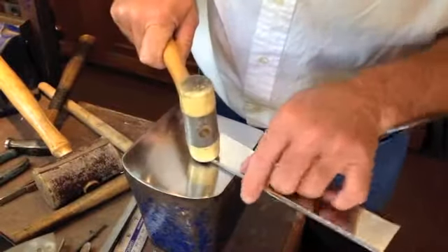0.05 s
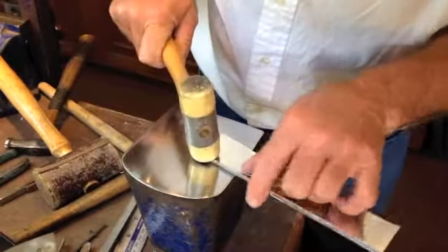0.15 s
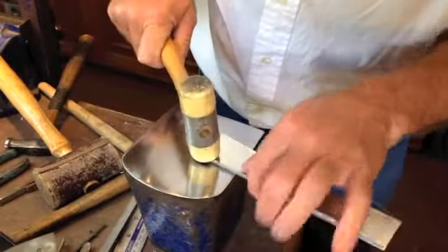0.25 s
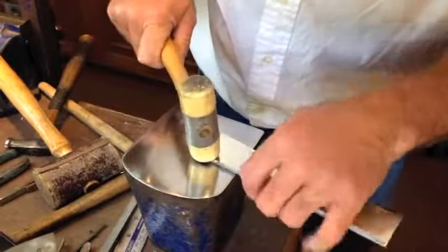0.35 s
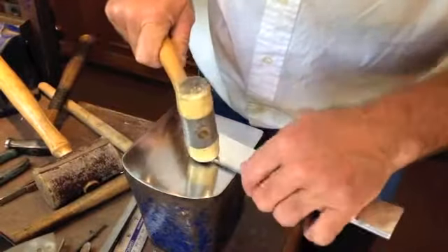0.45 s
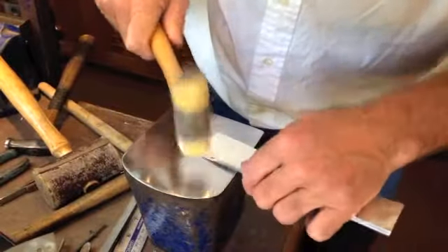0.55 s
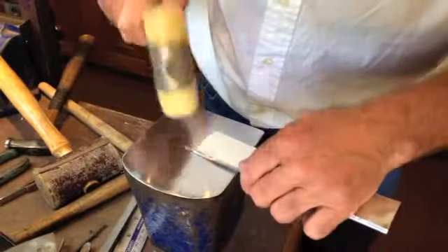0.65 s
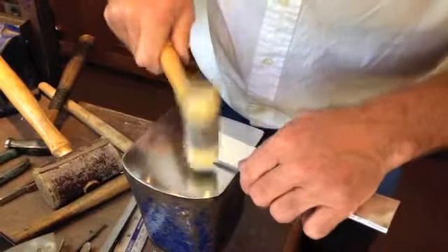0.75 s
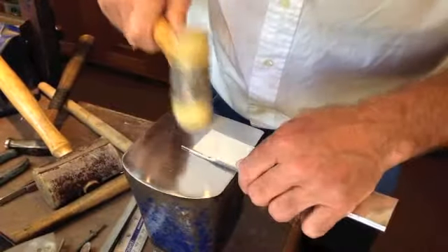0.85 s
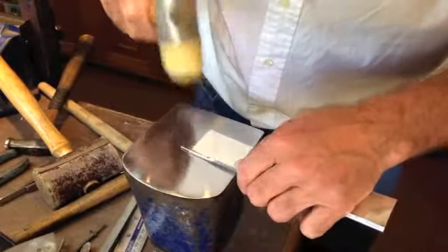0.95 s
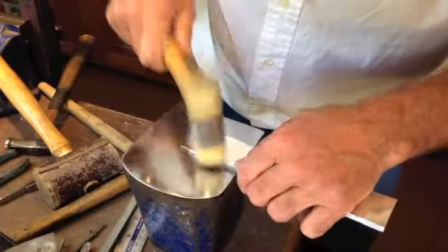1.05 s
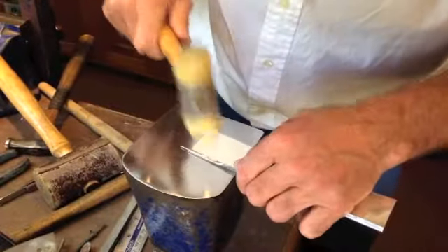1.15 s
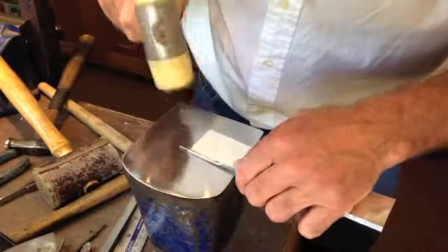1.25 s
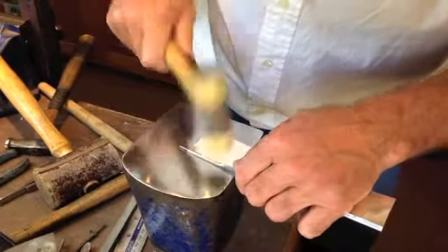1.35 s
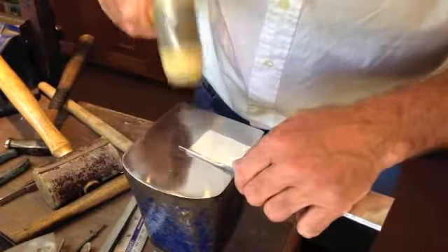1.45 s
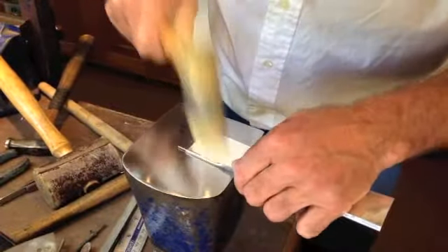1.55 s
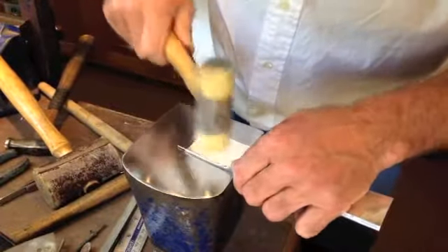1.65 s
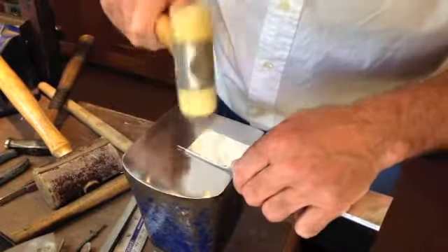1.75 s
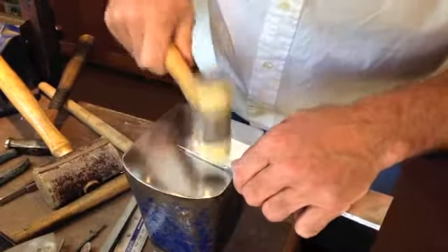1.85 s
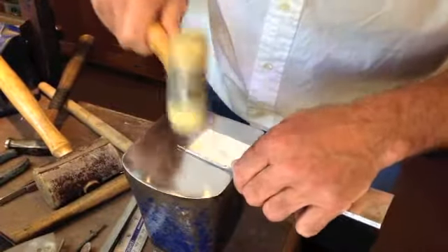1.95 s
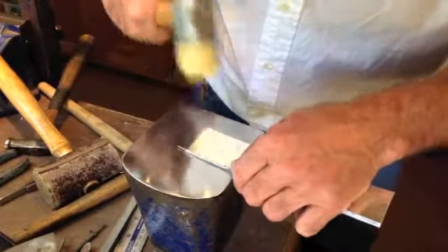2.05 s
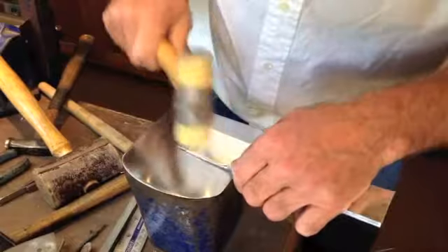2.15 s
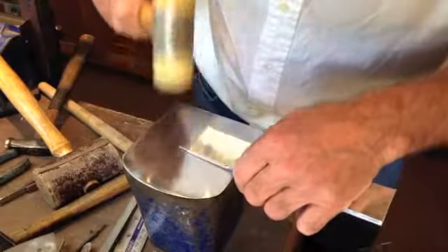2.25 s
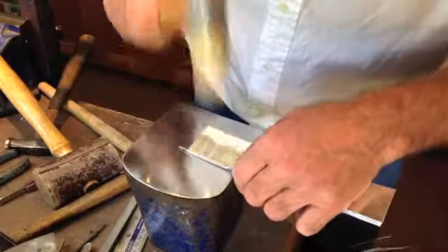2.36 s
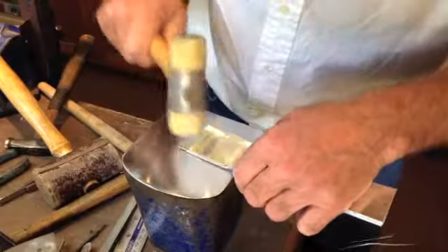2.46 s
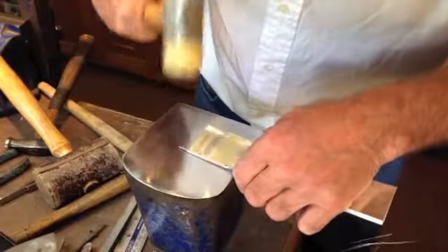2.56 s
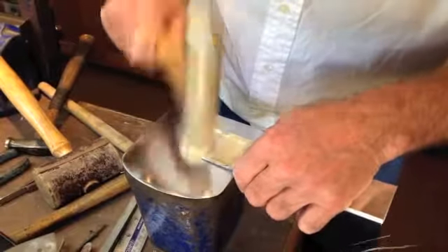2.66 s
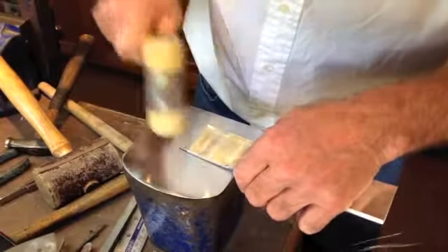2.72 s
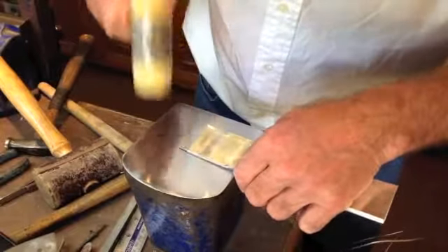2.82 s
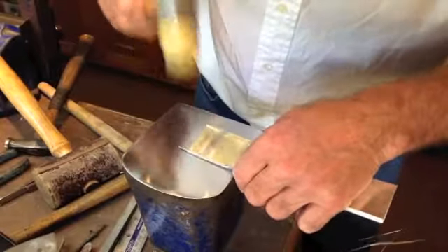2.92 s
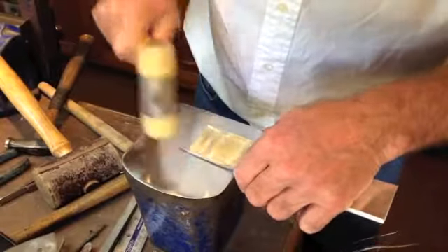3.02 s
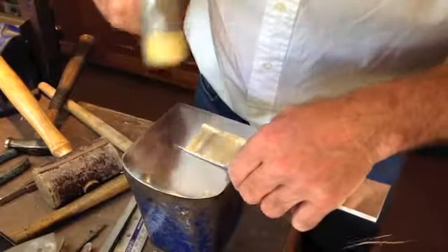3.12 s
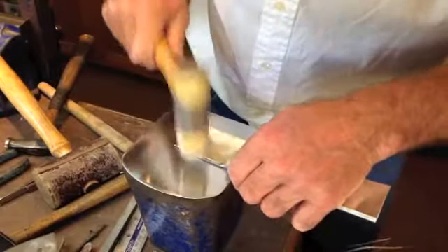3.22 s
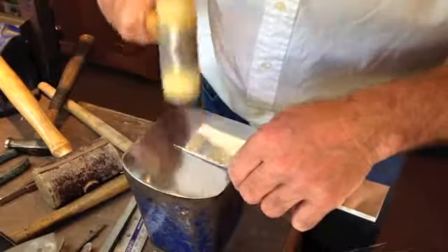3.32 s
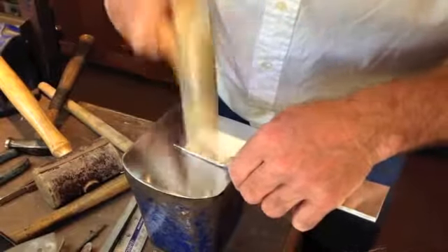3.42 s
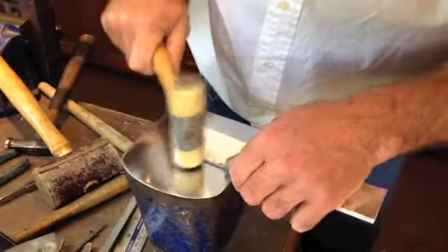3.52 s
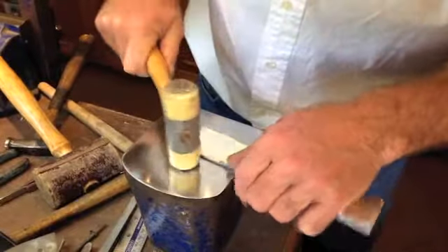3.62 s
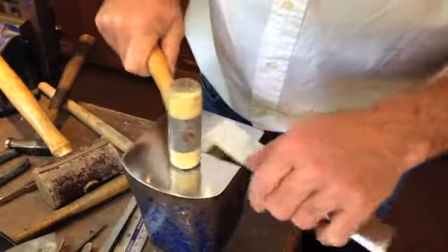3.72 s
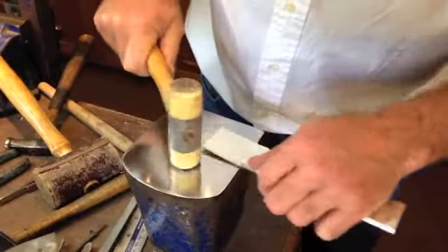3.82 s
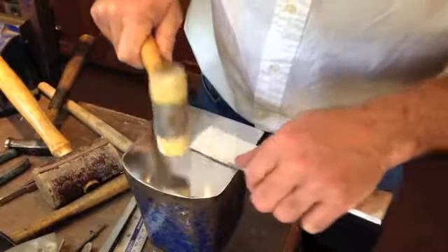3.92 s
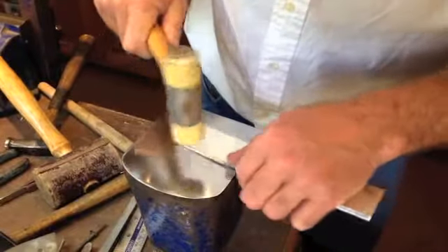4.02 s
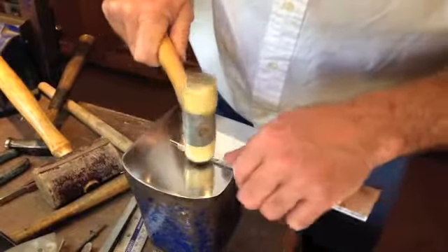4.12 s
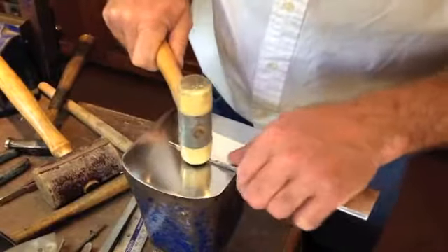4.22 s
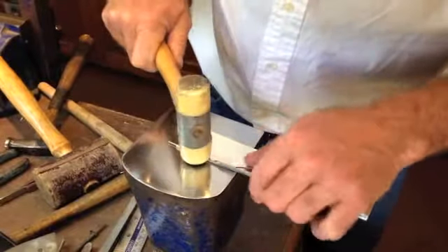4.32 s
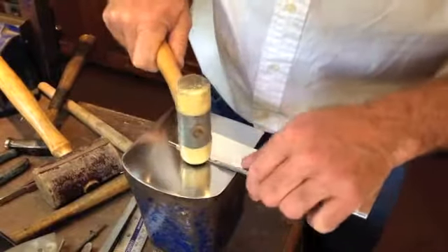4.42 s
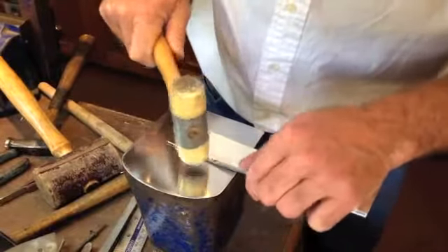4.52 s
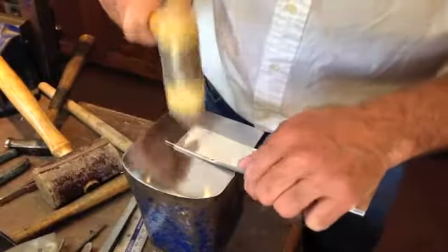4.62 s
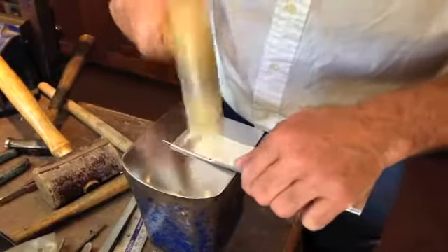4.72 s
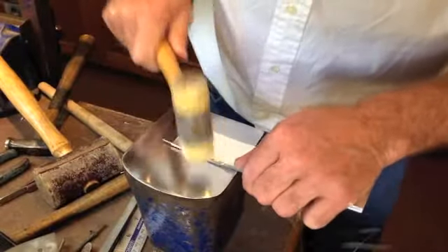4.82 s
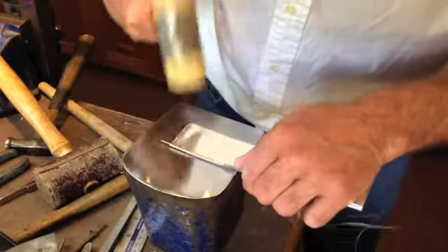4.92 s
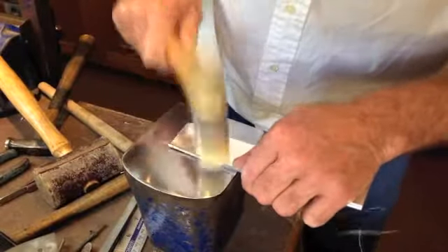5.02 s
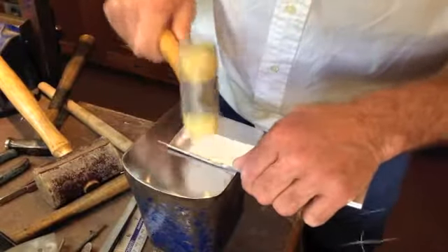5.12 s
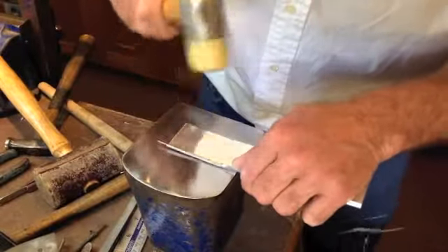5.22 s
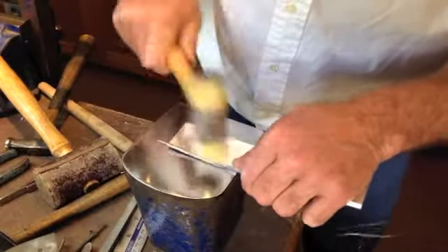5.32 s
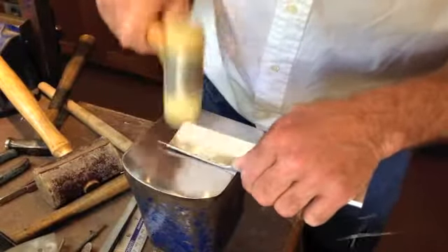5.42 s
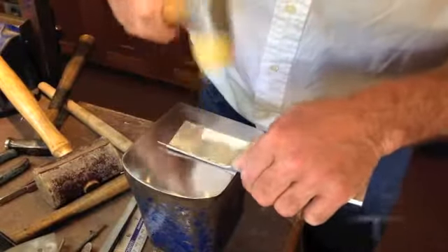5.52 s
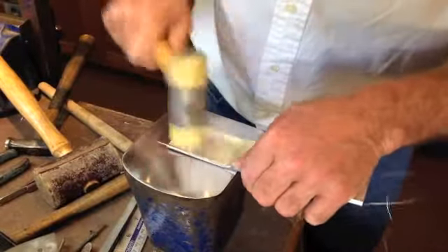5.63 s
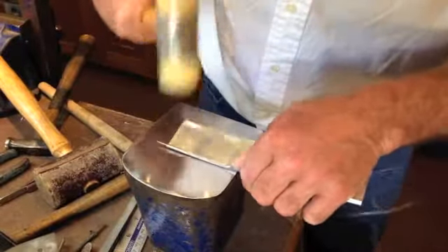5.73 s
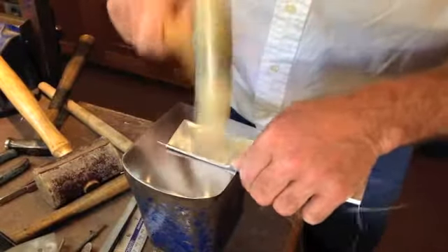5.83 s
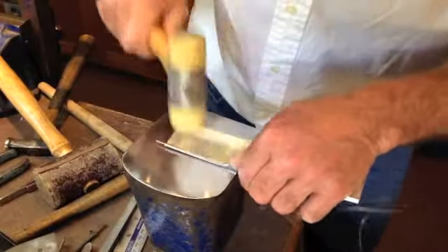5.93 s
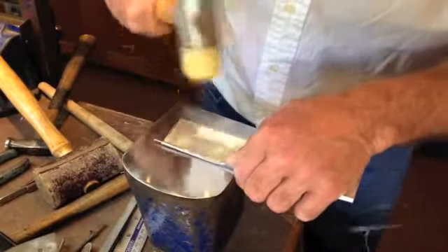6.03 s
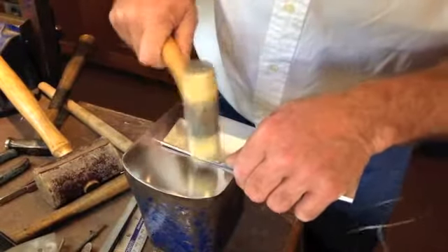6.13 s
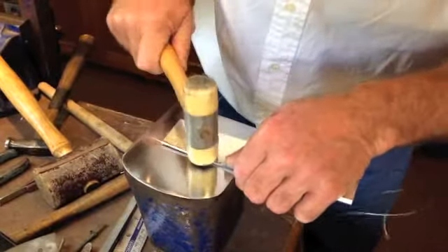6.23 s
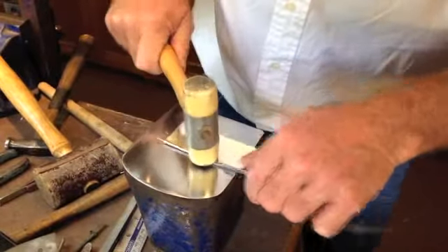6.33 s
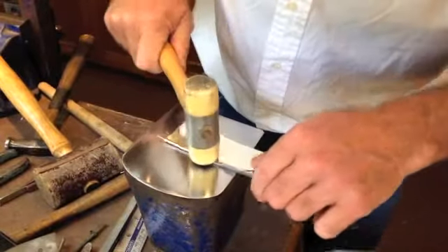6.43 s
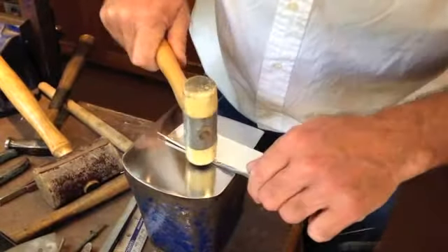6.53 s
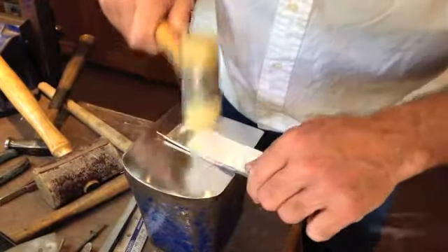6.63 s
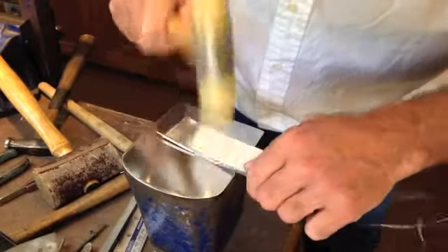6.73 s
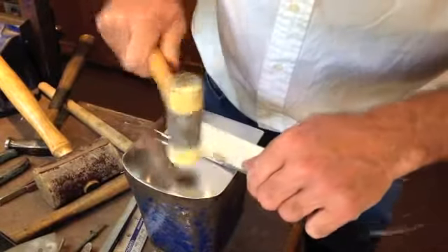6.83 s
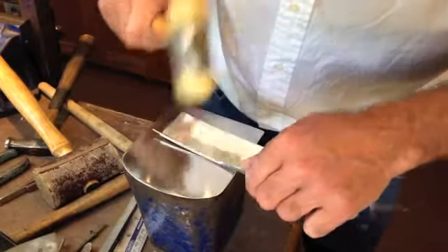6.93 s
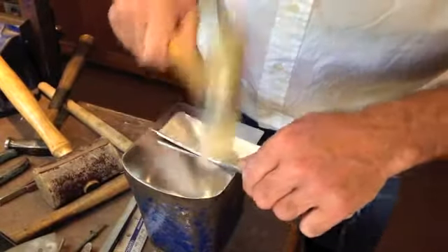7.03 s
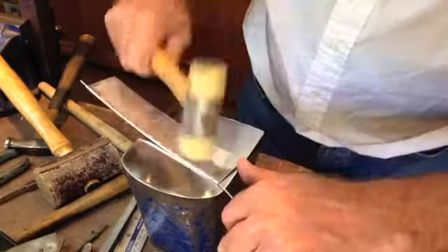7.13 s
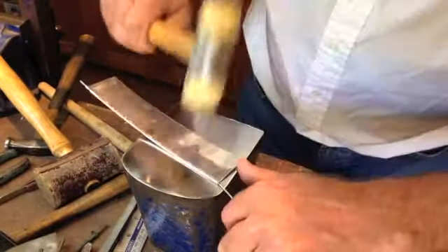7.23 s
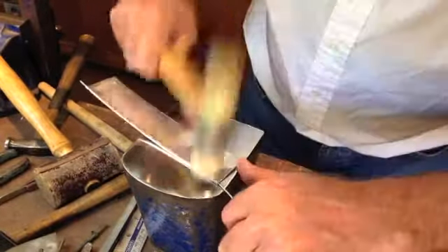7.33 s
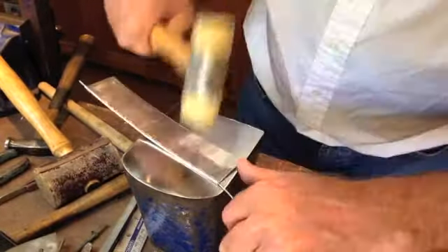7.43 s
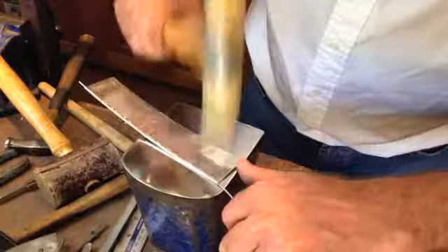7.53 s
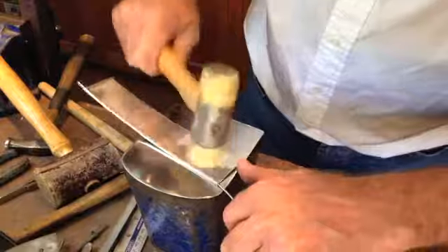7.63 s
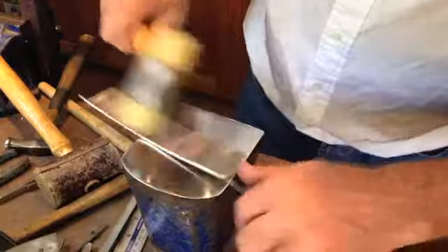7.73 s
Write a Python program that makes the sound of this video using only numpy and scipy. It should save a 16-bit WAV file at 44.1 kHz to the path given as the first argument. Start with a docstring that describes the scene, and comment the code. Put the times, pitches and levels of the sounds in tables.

```python
"""Small taps and faint rustle over a low room hum, then a mallet strikes a silver strip on a steel stake in quick runs,
heard close up in a small workshop. Each blow is a noise crack with decaying sines for sheet, mallet, bench and floor,
plus chattering noise as the loose strip buzzes. Taps of shaped noise with a short sheet ring, and noise rustle,
return between runs. Cracks and taps feed a diffuse echo. A short dip in level comes just before the last three blows."""
import sys
import numpy as np
from scipy import signal
from scipy.fft import rfft, irfft, next_fast_len
from scipy.io import wavfile
from scipy.ndimage import uniform_filter1d

SR = 44100
rng = np.random.default_rng(int(sys.argv[2]) if len(sys.argv) > 2 else 0)


def voltage_ratio(decibels):
    """Convert decibels (scalar or array-like) to amplitude ratios, 20 dB per decade."""
    exponent = np.asarray(decibels, float) / 20
    return 10 ** exponent


def wav_record(signal):
    """Record a signal, one row per channel, as 16-bit PCM in the file named by sys.argv[1]."""
    frames = np.transpose(np.atleast_2d(signal))
    bounded = np.clip(frames, -1, 1)
    # unit amplitude maps onto the largest positive 16-bit level
    quanta = np.round(bounded * 32767).astype(np.int16)
    wavfile.write(sys.argv[1], SR, quanta)


N = 342657
T = np.arange(N) / SR  # s


def colour(x, points):
    """Shapes a signal by (Hz, dB) points joined on a log axis, without phase shift."""
    hz, db = np.transpose(points)
    size = next_fast_len(len(x))
    f = np.maximum(np.arange(size // 2 + 1) * SR / size, 1)
    gain = voltage_ratio(np.interp(np.log(f), np.log(hz), db))
    return irfft(rfft(x, size) * gain, size)[:len(x)]


def noise(t, points):
    """Coloured noise as long as t."""
    return colour(rng.standard_normal(len(t)), points)


def unit(x):
    """Scales to an rms of one."""
    return x / np.sqrt(np.mean(x ** 2))


def ring(modes, t, scatter_db, detune):
    """Decaying sines, weighted and tuned a little differently at every call."""
    hz, db, t60_s = np.transpose(modes)[:, :, None]
    chance = rng.standard_normal((2, len(modes), 1))
    phase = 2 * np.pi * hz * (1 + detune * chance[0]) * t
    level = voltage_ratio(db + scatter_db * chance[1])
    decay = np.exp(-np.log(1000) * t / t60_s)
    return np.sum(level * decay * np.sin(phase), axis=0)


def add(out, start_s, x):
    """Mixes a sound in at its start time."""
    i = int(start_s * SR)
    out[i:i + len(x)] += x[:N - i]


def walk(rate_hz):
    """Random levels, each held for 1 / rate_hz, then smoothed."""
    k = int(SR / rate_hz)
    held = np.repeat(rng.standard_normal(N // k + 1), k)
    return uniform_filter1d(held, k)[:N]


def patchy(x):
    """Random uneven colour, drawn anew for each sound, to roughen the noise."""
    hz = np.geomspace(300, 16000, num=90)
    scatter_db = 4
    return colour(x, np.c_[hz, scatter_db * rng.standard_normal(len(hz))])


# Crack spectrum, shared by scratches and rustle. Each row: frequency in Hz, relative level in dB.
CRACK_SPECTRUM = [(530, -27.5), (900, -3.5), (1840, -5), (2270, -11), (2820, 1), (3550, -4.5), (4310, -0.5),
                  (5300, -5.5), (10100, -7), (12700, -13), (14200, -8.5), (15600, -20), (16400, -48)]


def crack(tilt, t):
    """The sheet flattens against the steel over a couple of milliseconds: a noise burst with a short tail."""
    rise_s = 0.0016
    slap = (t / rise_s) ** 2 * np.exp(2 - 2 * t / rise_s)
    tail = 0.36 * np.minimum(t / 0.004, 1) * np.exp(-t / 0.009)
    return (slap + tail) * colour(unit(noise(t, CRACK_SPECTRUM)), tilt)


# Pressed sheet, a close damped cluster. Each row: share of its ring pitch, relative level in dB, t60 in s.
SHEET_MODES = [(.9, -11, 0.025), (0.949, -6, 0.02), (1, -3.5, 0.024), (1.05, -5, 0.02), (1.099, -9, .022)]


def sheet(hz, t):
    """The damped cluster of sheet modes around one pitch."""
    modes = [(share * hz, db, t60_s) for share, db, t60_s in SHEET_MODES]
    return ring(modes, t, scatter_db=2.0, detune=0.012)


# Mallet head and stake seat. Each row: frequency in Hz, relative level in dB, t60 in s.
KNOCK_MODES = [(379.3, -2, 0.097), (412.6, -11, 0.16), (527, 2.5, 0.087), (788, 0, 0.02), (926, 3, 0.021),
               (1098, 0, 0.066), (1433, -9.5, .02)]


def knock(t):
    """Short modes of the mallet head and the stake in its seat."""
    return ring(KNOCK_MODES, t, scatter_db=4.5, detune=0.03)


# Bench top. Each row: frequency in Hz, relative level in dB, t60 in s.
BENCH_MODES = [(137.3, -6, 0.11), (170.7, -5.5, 0.21), (191, 3, 0.11), (224.8, 0, 0.17),
               (265.8, -7.5, 0.25)]


def thump(t):
    """Low modes of the bench top."""
    return ring(BENCH_MODES, t, scatter_db=2.5, detune=0.026)


# Floor and walls, set going through the stand. Each row: frequency in Hz, relative level in dB, t60 in s.
BOOM_MODES = [(48.2, -11.5, 1), (61, -8.5, 0.31), (76, -6, 0.85), (94.86, -1.5, 0.44), (112.7, -9.5, 0.52),
              (141.3, -1, 0.33), (186.5, -7, 0.46), (226.8, -12, 0.35)]


def boom(t):
    """The lows build slowly, hold, then fall off steeply, with a random, uneven wobble in level."""
    swell = (1 - np.exp(-t / 0.034)) * np.exp(-(t / 0.18) ** 4)
    wobble = voltage_ratio(3.7 * walk(50.6)[:len(t)])
    return swell * wobble * ring(BOOM_MODES, t, scatter_db=2.0, detune=0.0691)


# Loose strip's buzz spectrum. Each row: frequency in Hz, relative level in dB.
BUZZ_SPECTRUM = [(150, -24.5), (250, -2.5), (355, -7.5), (521, -5.5), (632, -12), (2480, -20.5),
                 (2700, -21), (5640, -20.5), (14300, -37), (15600, -33), (16400, -88)]


def buzz(tilt, ring_hz, ring_db, t):
    """The free end chatters on the stake until its swing dies; the treble goes first."""
    chatter = np.minimum(t / 0.001, 1) * np.exp(-t / 0.057 - (t / 0.27) ** 2)
    sizzle = np.minimum(t / 0.003, 1) * np.exp(-t / 0.07 - (t / 0.095) ** 2)
    rattle = colour(unit(patchy(noise(t, BUZZ_SPECTRUM))), tilt)
    rattle = rattle * voltage_ratio(2.4 * walk(130)[:len(t)] + 1.9 * walk(40)[:len(t)])
    # the chatter keeps the sheet's ring going roughly
    lift_db = 0.8 * max(ring_db + 13, 0)
    rattle = colour(rattle, [(0.8 * ring_hz, 0), (0.93 * ring_hz, lift_db),
                             (1.09 * ring_hz, lift_db), (1.25 * ring_hz, 0)])
    dull = colour(rattle, [(2500, -2.5), (7000, -19)])
    return chatter * dull + sizzle * (rattle - dull)


# Mallet blows and bounces, levels before each layer's trim. Each row: start in seconds, crack level in dB,
# bench thump level in dB, strongest sheet ring in Hz, sheet ring relative to the crack in dB.
BLOWS = [(0.821, -11, -25.5, 4480, -15), (1.0961, -5, -27.5, 1860, -16), (1.3766, -3, -23, 4110, -20),
         (1.6523, -11, -26.5, 1830, -9), (1.9172, -7.5, -22, 4620, -12), (2.1917, -9, -17.5, 3120, -11.5),
         (2.4713, -4.5, -20.5, 3720, -9.5), (2.7409, -4, -18.5, 2640, -13.5),
         (3.017, -8.5, -20, 2640, -10.5), (3.2936, -7, -21, 1590, -12.5), (3.5176, -5.5, -22.5, 2870, -9.5),
         (3.5647, -12, -27, 2810, -4), (3.596, -11, -28.5, 1860, -9), (4.1982, -15.5, -31, 4060, -3),
         (4.23, -12, -37, 4120, 0), (4.827, -3, -25, 1840, -18), (5.1077, -3.5, -21.5, 2110, -22),
         (5.3816, -5, -22, 2920, -11.5), (5.656, -5, -18, 2860, -11.5), (5.9262, -6.5, -21, 3060, -7),
         (6.1681, -5, -20, 2860, -20.5), (6.2215, -11, -27, 2750, -1), (6.2559, -14, -37, 2720, -11.5),
         (6.8378, -10.5, -27.5, 2930, -11), (7.169, -14, -19, 4150, -11), (7.4042, -6.5, -18, 4260, -8.5),
         (7.6329, -7.5, -14.5, 4450, -15)]
# Colour of the blows as the work moves along the strip. Each row: time in seconds, treble lift in dB,
# knock trim from the thump in dB, boom trim from the thump in dB.
BLOW_COLOUR = [(0.8, 0.5, -6, 3), (1.4, -6, -0.5, -3), (2.2, -2.5, -1.5, -2.5), (2.5, -.6, -3.5, -1),
               (3.4, 1.8, -1.2, -2), (4.2, 2.5, -4, 4), (5.1, -8.5, -2.2, -2), (5.7, -5, -2.5, -2),
               (6.8, -1.8, -2.5, 3), (7.3, 5.5, -14, -1), (7.65, 7, -4.5, -4)]


def blows():
    """Sums the layers of every blow; only the crack will be echoed."""
    sharp, body = np.zeros(N), np.zeros(N)
    t = T[:SR * 3 // 4]
    when_s, treble_db, knock_trim_db, boom_trim_db = np.transpose(BLOW_COLOUR)
    for s, crack_db, thump_db, ring_hz, ring_db in BLOWS:
        knock_db = thump_db + np.interp(s, when_s, knock_trim_db)
        boom_db = thump_db + np.interp(s, when_s, boom_trim_db)
        # flatter contact, more treble
        tilt = [(2500, 0.013), (12000, np.interp(s, when_s, treble_db))]
        add(sharp, s + 0.0005, voltage_ratio(crack_db - 8.0) * crack(tilt, t))
        add(body, s + 0.001054, voltage_ratio(crack_db + ring_db) * sheet(ring_hz, t))
        add(body, s + 0.002392, voltage_ratio(knock_db - 2.0) * knock(t))
        add(body, s + 0.002, voltage_ratio(thump_db - 2.0) * thump(t))
        add(body, s + 0.0014, voltage_ratio(boom_db) * boom(t))
        add(body, s, voltage_ratio(thump_db - 7) * buzz(tilt, ring_hz, ring_db, t))
    return sharp, body


# Steel stake, low and high ring. Each row: frequency in Hz, t60 in s.
STAKE_MODES = [(3490, .55), (9275, .7)]
# Blows that leave the stake free to sing. Each row: start in seconds, low ring in dB, high ring in dB.
STAKE_SINGS = [(.822, -44, -75), (1.097, -70, -60), (2.192, -62, -63), (2.472, -56, -59), (2.742, -63, -63),
               (3.017, -60, -64), (3.596, -60, -56), (5.927, -47, -58), (7.169, -58, -54),
               (7.405, -49, -53), (7.633, -54, -57)]


def stake():
    """Two thin rings of the steel, faded out by about when the next blow comes."""
    out, t = np.zeros(N), T[:SR // 2]
    fade = np.exp(-(t / 0.28) ** 4)
    for s, *levels_db in STAKE_SINGS:
        modes = [(hz, db, t60_s) for (hz, t60_s), db in zip(STAKE_MODES, levels_db)]
        add(out, s, fade * ring(modes, t, scatter_db=0, detune=0))
    return out


# The strip touches the stake or the bench, levels before trim. Each row: start in seconds, tick level in dB,
# thud level in dB, ring in Hz, ring relative to the tick in dB.
TAPS = [(0.0228, -42.5, -70, 2026, -7), (0.0856, -42.5, -69, 4200, -17), (0.176, -52.5, -90, 3280, -9),
        (0.252, -36.5, -60, 4000, -11), (0.2804, -44, -66, 6970, -6), (0.361, -49.5, -83, 10200, -9),
        (0.401, -56, -70, 9950, -6), (0.481, -52.5, -74, 2040, -17), (0.503, -66, -53.5, 6880, -9),
        (0.595, -58.5, -79, 5030, -3), (1.034, -55, -52, 2040, -6), (2.0404, -44.5, -53, 2035, 1.5),
        (2.2852, -32.5, -40, 5500, -8), (2.569, -31, -56, 5800, -8), (2.8422, -32, -44, 1530, -15),
        (3.235, -40, -52.5, 1980, -12), (3.6598, -33.5, -46, 1800, -3.5), (3.692, -45, -48, 1820, -13),
        (3.7643, -33.5, -53, 1540, -18), (3.8018, -40.5, -37, 2010, 4), (3.8133, -43.5, -37, 1900, 2),
        (3.8884, -45, -50, 4480, -10), (3.941, -65, -36, 1510, -3), (4.093, -57, -69, 1950, -10),
        (4.4887, -45, -77, 3500, -8), (4.5175, -47.5, -73, 2250, -8), (4.558, -49, -67, 2000, -5),
        (6.326, -31.5, -49, 6300, -13), (6.446, -42, -74, 4140, -19), (6.553, -44, -71, 4430, -5),
        (6.602, -44.5, -71, 4460, -12), (6.637, -44.5, -67, 4530, -8), (6.672, -46, -57, 1940, -11),
        (7.117, -41, -45.5, 2980, -11.5)]


def taps():
    """Light contacts: a brief scratch and a sheet ring, both echoed, and a dull, rough knock."""
    sharp, body, t = np.zeros(N), np.zeros(N), T[:SR // 5]
    scratch_fade = np.minimum(t / 0.0018, 1) * np.exp(-t / 0.018)
    thud_fade = np.minimum(t / 0.0029, 1) * np.exp(-t / 0.036)
    for s, tick_db, thud_db, ring_hz, ring_db in TAPS:
        peak_db = max(ring_db + 15.5, 0)
        scratch = patchy(noise(t, CRACK_SPECTRUM))
        scratch = unit(colour(scratch, [(0.78 * ring_hz, 0), (ring_hz, peak_db), (1.1 * ring_hz, 0)]))
        flutter = voltage_ratio(2.8 * walk(400)[:len(t)])
        thud = unit(noise(t, [(150, -16.0), (330, 11), (600, 3.5), (1300, -11.5), (2500, -41)]))
        add(sharp, s, voltage_ratio(tick_db - 8.5) * scratch_fade * flutter * scratch)
        add(sharp, s, voltage_ratio(tick_db + ring_db) * sheet(ring_hz, t))
        add(body, s, voltage_ratio(thud_db - 2.0) * thud_fade * thud)
    return sharp, body


# Rustle of hands moving the strip, one list per spell. Each row: time in seconds, level in dB.
HAND_SPELLS = [
    [(0.0, -57.5), (0.154, -102), (0.478, -79), (0.62, -98), (0.8, -93)],
    [(3.7, -77), (3.76, -60), (3.99, -75), (4.17, -84)],
    [(4.4, -64.5), (4.584, -68), (4.8, -94)],
    [(6.42, -80), (6.478, -73), (6.618, -71), (6.82, -80)],
]


def hands():
    """Uneven noise rustle while the strip is moved."""
    gain = sum(voltage_ratio(np.interp(T, *np.transpose(spell), left=-120, right=-120)) for spell in HAND_SPELLS)
    return gain * voltage_ratio(1.1 * walk(57)) * unit(noise(T, CRACK_SPECTRUM))


# Room echo. Each row: band centre in Hz, level in dB, t60 in s before the extra late fall.
ROOM_BANDS = [(190, 4, 0.33), (361, -12, 0.8), (743, -22.5, 0.48), (1310, -15.5, 0.29), (2740, -29.5, 0.13),
              (5460, -19, 0.38), (11700, -20.5, 0.16)]


def room(x):
    """Diffuse echo that builds in a few milliseconds, then falls ever faster, each band at its own rate."""
    t, echo = T[:SR // 2], 0
    build = np.clip(t / 0.0045 - 0.4, 0, 1)
    for hz, db, t60_s in ROOM_BANDS:
        band = noise(t, [(hz / 4, -40), (hz / 2 ** 0.5, -3), (hz * 2 ** 0.5, -3), (hz * 4, -40)])
        fade = np.exp(-np.log(1000) * t / t60_s - (t / (0.29 * t60_s)) ** 2)
        band = band * fade * build
        echo = echo + voltage_ratio(db) * band / np.sqrt(np.sum(band ** 2))
    return signal.fftconvolve(x, echo)[:N]


# Workshop hum and hiss. Each row: frequency in Hz, relative level in dB.
AIR_SPECTRUM = [(15, -54), (25, -29), (53, -17.5), (65, -11.5), (114, -8), (127, -10), (146, -14),
                (251, -27.5), (1470, -32.5), (1920, -34.5), (9030, -42), (13600, -44), (16400, -64.5)]


def air():
    """Low hum and hiss of the workshop, steady noise wavering a little."""
    level_db, waver_db = -57, 1.5
    return voltage_ratio(level_db + waver_db * walk(4.7)) * unit(noise(T, AIR_SPECTRUM))


# Overall level around the dip. Each row: time in seconds, gain in dB.
DIP = [(7.06, -9), (7.095, -7), (7.11, -21), (7.117, 4), (7.126, -31.5), (7.145, -15), (7.165, 1)]


def scene():
    """Sums the bench, the hands and the room; the level dips briefly."""
    (cracks, body), (ticks, thuds) = blows(), taps()
    sharp = cracks + ticks
    mix = sharp + room(sharp) + body + thuds + stake() + hands() + air()
    gain = voltage_ratio(np.interp(T, *np.transpose(DIP), left=0, right=0))
    return (mix * gain)[None]


def roll_off(x):
    """The treble ends steeply here."""
    return signal.sosfilt(signal.butter(12, 16550, fs=SR, output="sos"), x)


# Narrow dips and bumps near 2.8 kHz. Each row: frequency in Hz, gain in dB.
NARROW_RIPPLE = [(2600, 0.5), (2720, 1), (2790, -4), (2900, 2), (3050, -4.5), (3150, -0.5)]


def record(dry):
    """Deepest bass lost, peaks rounded, a narrow ripple smears blows slightly both ways in time, top cut."""
    bass_cut = signal.butter(3, 40, "high", fs=SR, output="sos")
    top_cut = signal.ellip(8, 0.2, 36, 15300, fs=SR, output="sos")
    mix = signal.sosfilt(bass_cut, dry)
    rounded = np.tanh(1.074 * mix[0]) / 1.165
    mix = colour(rounded, NARROW_RIPPLE)[None]
    mix = signal.sosfilt(top_cut, mix)
    return roll_off(mix)


dry = scene()
out = record(dry)
wav_record(out)
```